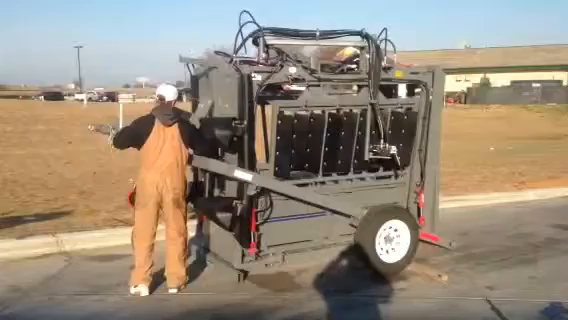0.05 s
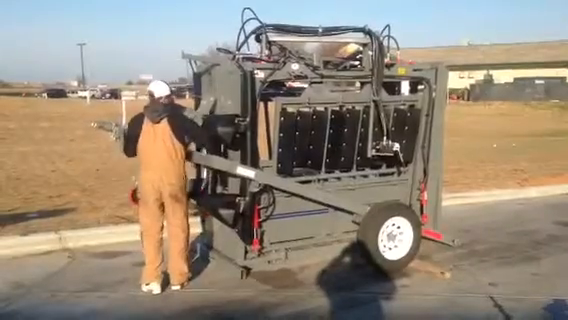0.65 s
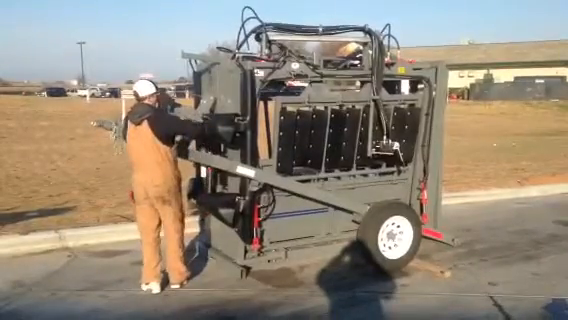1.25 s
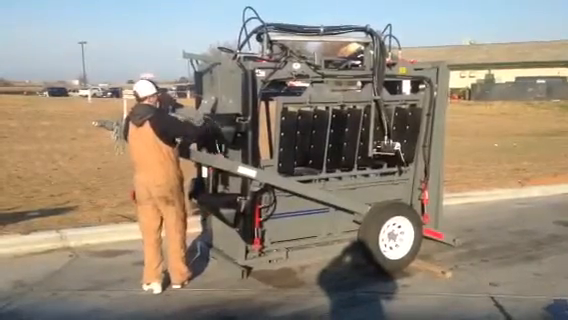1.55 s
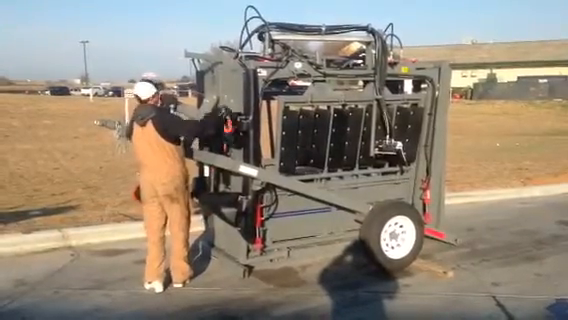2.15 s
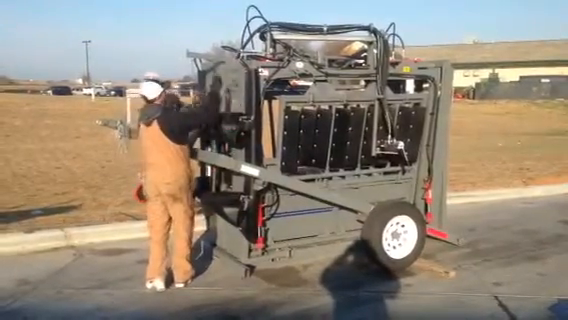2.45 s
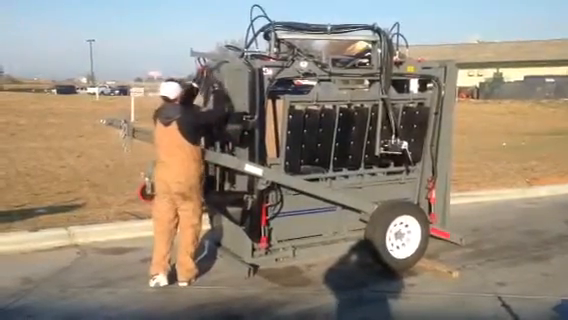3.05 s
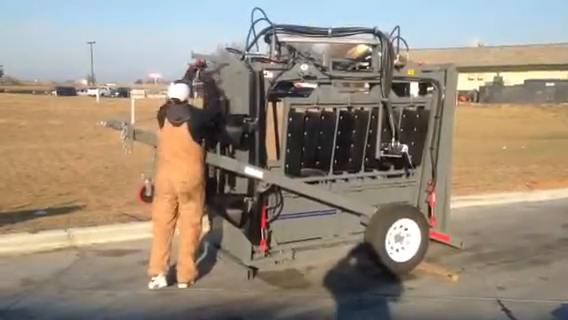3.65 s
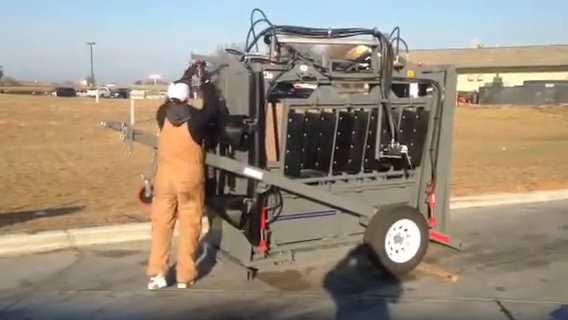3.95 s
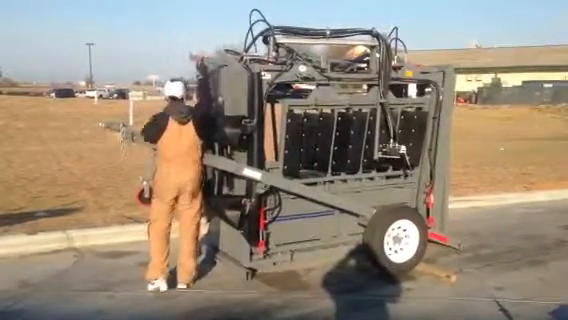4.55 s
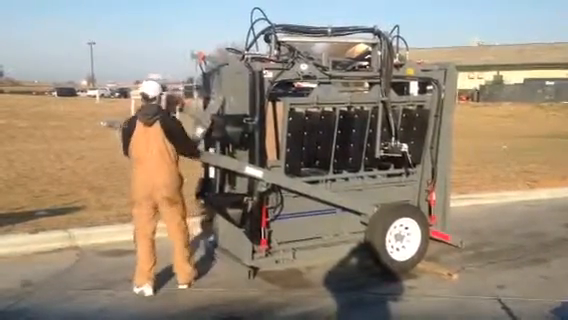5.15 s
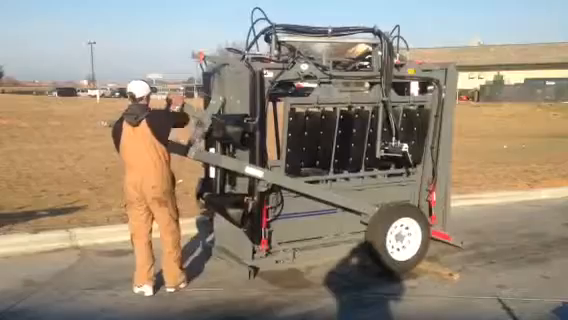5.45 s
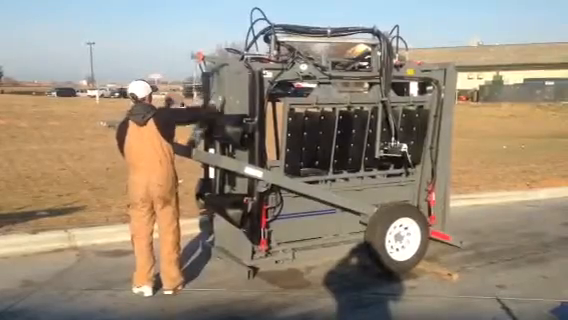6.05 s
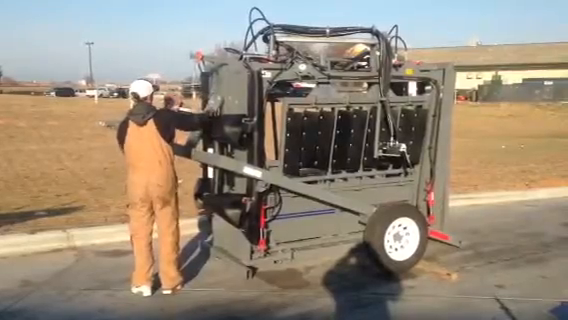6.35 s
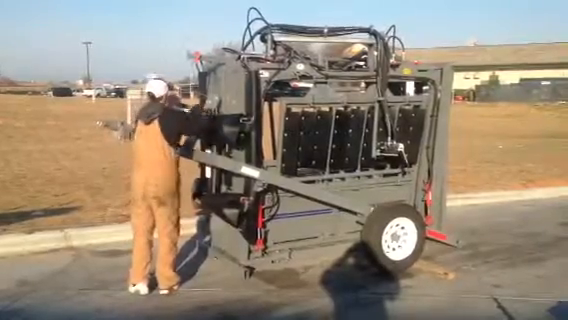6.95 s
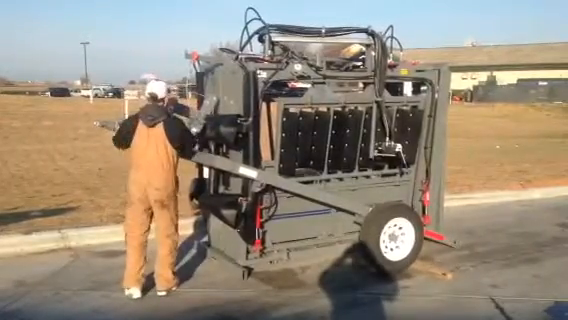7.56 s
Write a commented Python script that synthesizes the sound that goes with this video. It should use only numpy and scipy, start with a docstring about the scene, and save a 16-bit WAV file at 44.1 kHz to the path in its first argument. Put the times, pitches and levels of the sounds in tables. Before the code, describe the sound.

An engine idles low under a soft rush of far traffic outdoors. A few small metal knocks lead to one loud, bright steel clank that rings and ends in two lighter clinks, making the microphone's level dip and recover. Later some fittings rattle, and a hand winch gives a quick run of ratchet clicks, then a shorter one, while a vehicle drones softly past.

```python
"""Steel slam and hand winch

On an open lot, a worker readies a steel machine on a trailer. A latch rattles, then a freed
steel part slams into the frame, rings and settles with two clinks; an automatic volume control
dips and slowly recovers. Later a hand winch is cranked: its catch (the pawl) clicks over the
teeth in two short runs. Behind it all an engine idles, far traffic swells and one vehicle passes."""
import sys
import numpy as np
from scipy import signal
from scipy.fft import rfft, irfft, next_fast_len
from scipy.io import wavfile
from scipy.ndimage import uniform_filter1d

SR = 44100
rng = np.random.default_rng(int(sys.argv[2]) if len(sys.argv) > 2 else 0)


def to_wav(s):
    """Save 16-bit WAV."""
    ch = np.atleast_2d(s).T  # columns
    pcm = np.round(np.clip(ch, -1, 1) * 32767)  # PCM
    wavfile.write(sys.argv[1], SR, pcm.astype(np.int16))


N = 344862

# Strong tones of the struck steel: (pitch [Hz], relative level [dB], time to fade by 60 dB [s])
STEEL_TONES = [(290, -53, 2.22), (778, -28, 0.15), (802, -30, 0.3), (850, -33, 0.19), (1389, -43, 0.45),
               (1508, -26, 0.35), (1523, -28, 0.41), (1543, -25, 0.51), (1739, -17, 0.32),
               (1765, -27, 0.24), (2341, -28, 0.33), (2428, -14.5, 0.28), (2455, -21.5, 0.3),
               (2498, -25, 0.31), (2632, -22, 0.26), (2668, -19, 0.24), (2695, -23, 0.24),
               (2726, -24, 0.24), (2834, -25, 0.31), (2923, -27, 0.27), (3295, -30, 0.28), (3381, -31, 0.3),
               (3604, -20.5, 0.25), (3622, -23.5, 0.24), (4011, -31, 0.27), (4045, -33, 0.24),
               (4721, -39, 0.2), (5157, -21.5, 0.31), (5970, -48, 0.27), (6455, -37, 0.15)]
# Colour of the frame's many weak tones: (pitch [Hz], relative level [dB per Hz])
FRAME_COLOUR = [(300, -33), (600, -26), (780, -11), (1100, -20.5), (1600, -2.5), (2150, -4.5), (2800, 4),
                (3200, -3), (4000, -3.5), (4400, -11.5), (6700, -15), (7500, -24), (8700, -28),
                (10500, -44), (15000, -58)]
# How long those weak tones ring: (pitch [Hz], fade time [s])
FRAME_FADES = [(300, 0.25), (1000, 0.25), (2700, 0.3), (4500, 0.18), (7000, 0.15), (14000, 0.12)]

def clank():
    """Steel slams on steel: a crack, many weak tones, and strong ones that build as the parts chatter."""
    t, out = np.arange(2 * SR) / SR, np.zeros(N)
    early, slam_s = t[:SR // 2], 1.694
    _, tones = weak_tones(FRAME_COLOUR, FRAME_FADES, early, count=480)
    crack = noise(FRAME_COLOUR, len(early)) * blow(early, rise_s=.001, fade_s=.05)
    frame = strike(tones, 1, early, rise_s=.005)
    steel = ringing(STEEL_TONES, t, rise_s=.015, spread_db=.1, contact=hump(2500, octaves=20))
    add(out, slam_s, from_db(-19) * crack + from_db(-15.5) * frame)
    add(out, slam_s, steel)
    return from_db(13) * out


# Light touches after the slam: (time [s], level [dB])
CLINK_HITS = [(2.052, -23), (2.245, -26.5)]

def clinks():
    """The part settles against the frame: the same steel tones, duller, with a little rubbing."""
    t, out = np.arange(SR // 2) / SR, np.zeros(N)
    rise_s, contact = .0043, hump(3700, octaves=.57)
    for s, db in CLINK_HITS:
        steel = ringing(STEEL_TONES, t, rise_s, spread_db=6, contact=contact)
        rub = noise(hump(2460, octaves=.71), len(t)) * blow(t, rise_s, fade_s=.6)
        add(out, s, from_db(db) * (steel + from_db(-20) * rub))
    soften = signal.butter(8, 4150, fs=SR, output="sos")   # a light touch stirs few high tones
    return signal.sosfilt(soften, out)


# Each drop of the pawl over a tooth: (time [s], level [dB])
PAWL_DROPS = [(5.593, -28), (5.700, -29.5), (5.798, -29.5), (5.873, -28), (5.932, -24.5), (5.987, -28.5),
              (6.048, -31), (6.106, -31.5), (6.157, -30), (6.210, -28.5), (7.321, -31.5), (7.391, -31),
              (7.496, -31.5), (7.62, -28), (7.713, -27), (7.811, -27)]
# Colour of the pawl's snap: (pitch [Hz], relative level [dB per Hz])
SNAP_COLOUR = [(400, -40), (1300, -3), (2000, 0.5), (2700, 3.5), (3700, 1), (4200, -4), (4700, -3),
               (5800, -8), (7200, -15.5), (9000, -27), (14000, -37)]
# Strong tones of the winch: (pitch [Hz], relative level [dB], fade time [s])
WINCH_TONES = [(753, -3.5, 0.056), (1370, -16, 0.16), (2016, -8.5, 0.16), (2504, -14, 0.16),
               (2490, -14, 0.4), (2700, -19, 0.095), (2810, -9, .09), (2920, -9, 0.075), (3450, -15, 0.17),
               (3730, -15, 0.12), (4620, -19, 0.16), (4770, -35, 0.29), (5200, -33, 0.26),
               (4970, -43, 0.23), (5820, -17, 0.056), (6670, -28, .06), (7280, -42, .04), (8370, -32, .05),
               (9250, -31, .09)]
# How long the winch's weak tones ring: (pitch [Hz], fade time [s])
WINCH_FADES = [(600, 0.2), (3000, 0.18), (5000, 0.17), (9000, 0.062)]

def ratchet():
    """The pawl snaps down over each tooth, bounces once and sets the winch ringing."""
    t, out = np.arange(SR // 4) / SR, np.zeros(N)
    tone_hz, tones = weak_tones(SNAP_COLOUR, WINCH_FADES, t, count=200)
    rise_s, lead_in_s = .0042, .02
    usual_db = np.mean(PAWL_DROPS, axis=0)[1]
    swell = np.linspace(0, 1, round(lead_in_s * SR))
    for s, db in PAWL_DROPS:
        contact = hump(3220 * 2 ** (.16 * (db - usual_db)), octaves=1.9)   # a harder drop is brighter
        bounce_s = .0072 * rng.uniform(.25, 1.72)
        drop = blow(t, rise_s, fade_s=.037)
        bounce = from_db(-4.5) * blow(t - bounce_s, rise_s=.00068, fade_s=.018)
        echoes = from_db(-15) * blow(t, rise_s=.012, fade_s=.16)   # off the frame and the ground
        colour = [(hz, level + at_hz(contact, hz)) for hz, level in SNAP_COLOUR]
        snap = noise(colour, len(t)) * np.hypot(drop + bounce, echoes)
        shimmer = strike(tones, from_db(at_hz(contact, tone_hz)), t, rise_s)
        winch = ringing(WINCH_TONES, t, rise_s, spread_db=5, contact=contact)
        lead_in = noise(SNAP_COLOUR, len(swell)) * swell   # a faint hiss swells just before each click
        click = from_db(-5) * snap + from_db(-10) * shimmer + from_db(-4) * winch
        add(out, s + rise_s - lead_in_s, from_db(db - 16.5) * lead_in)
        add(out, s, from_db(db) * click)
    return out


# Bumps of the latch and loose fittings: (time [s], level [dB], pitch [Hz])
LATCH_KNOCKS = [(0.216, -47.5, 3250), (1.018, -38, 2940), (1.038, -34.5, 2160), (1.134, -28.5, 2080),
                (1.366, -47, 3400), (4.575, -27, 2740), (4.679, -30.5, 3750), (4.688, -38, 1410),
                (4.807, -45, 3800), (4.982, -45, 4200)]
# The latch sliding in its guide: (time [s], level [dB])
LATCH_SLIDES = [(4.548, -34.5), (4.62, -44), (5.271, -46)]

def latch_rattle():
    """The latch and loose fittings bump and slide; the higher a knock, the sooner it dies."""
    out = np.zeros(N)
    for s, db, hz in LATCH_KNOCKS:
        fade_s = .26 * min(2120 / hz, 1) ** 2.2
        add(out, s, from_db(db) * latch_touch(hump(hz, octaves=.44), rise_s=.005, fade_s=fade_s))
    for s, db in LATCH_SLIDES:
        add(out, s, from_db(db) * latch_touch(hump(3200, octaves=.34), rise_s=.019, fade_s=.34))
    soften = signal.butter(2, 9000, fs=SR, output="sos")   # blunt bumps have little high treble
    return signal.sosfilt(soften, out)


# Tones of the latch: (pitch [Hz], relative level [dB], fade time [s])
LATCH_TONES = [(1070, 1, 0.1), (1533, -6, .25), (1850, -4.5, 0.22), (2000, -23, .18), (2315, -3, 0.11),
               (2270, -12, 0.58), (2490, -4, 0.076), (2845, -0.5, 0.083), (2990, -10, 0.097),
               (3730, -5.5, 0.11), (3950, -12, 0.1), (5340, -11, .14), (5900, -16, .07), (6800, -1, 0.095),
               (8460, 3, .06)]

def latch_touch(contact, rise_s, fade_s):
    """One touch makes a short burst of noise and wakes the latch tones near its own pitch."""
    t = np.arange(SR // 3) / SR
    bump = noise(contact, len(t)) * blow(t, rise_s, fade_s)
    return from_db(-3) * bump + ringing(LATCH_TONES, t, rise_s, spread_db=1.5, contact=contact)


# Faint squeaks at their loudest: (time [s], level [dB])
CRANK_SQUEAKS = [(6.87, -48.5), (7.13, -53)]

def crank_squeak():
    """A dry bearing sings briefly at a wavering pitch as the handle turns."""
    t, swell_s = np.arange(N) / SR, .06
    swell = sum(from_db(db) * np.exp(-.5 * ((t - s) / swell_s) ** 2) for s, db in CRANK_SQUEAKS)
    pitch_hz = 2460 + 18 * noise([(1, -4), (30, -2.5), (200, -38.5)], N)
    return swell * np.sin(2 * np.pi * np.cumsum(pitch_hz) / SR)


# Colour of an engine's rumble: (pitch [Hz], relative level [dB per Hz])
RUMBLE_COLOUR = [(20, -35), (35, -14), (48, -14), (60, -8.5), (76, 1.5), (100, -3.5), (145, 2.5),
                 (200, -12.5), (270, -9), (350, -23.5), (600, -54)]
# Hums made by the engine's firing: (pitch [Hz], relative level [dB])
ENGINE_HUMS = [(48, -48.5), (74, -57), (141, -53.5)]

def idling_engine():
    """The engine rumbles low, and its firing adds a few unsteady hums."""
    hums = 0
    for hz, db in ENGINE_HUMS:
        pitch_hz = hz + 2.98 * noise([(1, -.5), (6, -5), (30, -49.5)], N)
        hums += from_db(db) * np.sin(2 * np.pi * np.cumsum(pitch_hz) / SR)
    return from_db(-43.5) * noise(RUMBLE_COLOUR, N) + from_db(-2.5) * hums


def passing_vehicle():
    """Exhaust drone and rumble grow as a vehicle nears; the drone's pitch sinks as it goes by."""
    t = np.arange(N) / SR
    nearest_s, nearest_m, speed_m_per_s = 6.35, 13, 11
    drone_hz, sound_m_per_s = 186, 343
    distance_m = np.hypot(speed_m_per_s * (t - nearest_s), nearest_m)
    phase = 2 * np.pi * drone_hz * (t - distance_m / sound_m_per_s)
    # How the drone flutters: (rate [Hz], relative level [dB])
    throb = [(1, 1), (42, -1.5), (65, -15), (140, -19.5), (400, -84)]
    drone = noise(throb, N) * np.cos(phase) + noise(throb, N) * np.sin(phase)
    vehicle = from_db(-39.5) * drone + from_db(-45.5) * noise(RUMBLE_COLOUR, N)
    return vehicle * nearest_m / distance_m


# Colour of far roads and wind: (pitch [Hz], relative level [dB per Hz])
TRAFFIC_COLOUR = [(100, -14.5), (380, -2.5), (550, 3.5), (800, 2), (1300, -0.5), (1800, -0.5), (2350, 1.5),
                  (2800, -2.5), (3450, -3.5), (4100, -15.5), (5000, -24), (6500, -29), (10000, -32),
                  (15500, -33.5)]

def far_traffic():
    """Distant roads blur into a soft rush that slowly swells and ebbs."""
    t = np.arange(N) / SR
    crest_s, period_s = 1.55, 5.3
    level_db = -45.5 + .45 * np.cos(2 * np.pi * (t - crest_s) / period_s)
    return from_db(level_db) * noise(TRAFFIC_COLOUR, N)


def ringing(tones, t, rise_s, spread_db, contact):
    """Struck metal rings in fading tones, shaped by the colour of the contact and a little by chance."""
    return sum(from_db(db + at_hz(contact, hz) + spread_db * rng.standard_normal())
               * blow(t, rise_s, fade_s)
               * np.sin(2 * np.pi * (hz * t + rng.random())) for hz, db, fade_s in tones)


def weak_tones(colour, fades, t, count):
    """A steel body's many faint tones: their random pitches, and one fading complex wave for each."""
    hz = 300 + 14500 * (np.arange(count) + rng.random(count)) / count
    fade_s = at_hz(fades, hz) * from_db(rng.uniform(-2.2, 3.5, count))
    gain = from_db(at_hz(colour, hz))
    gain /= np.linalg.norm(gain)
    rate = 2j * np.pi * hz - np.log(1000) / fade_s
    return hz, gain[:, None] * np.exp(rate[:, None] * t)


def strike(tones, weights, t, rise_s):
    """One hit starts every weak tone with a random strength, at a random point in its wave."""
    push = weights * (rng.standard_normal(len(tones)) + 1j * rng.standard_normal(len(tones)))
    return (push @ tones).real * np.clip(t / rise_s, 0, 1)


def blow(t, rise_s, fade_s):
    """Shaking builds up during a hit, then falls by 60 dB every fade_s seconds."""
    return np.clip(t / rise_s, 0, 1) * np.exp(-np.log(1000) * np.maximum(t - rise_s, 0) / fade_s)


def noise(colour, size):
    """Noise with the given colour (its balance of low and high pitches) and a typical size of 1."""
    length = next_fast_len(size)
    hz = np.maximum(np.fft.rfftfreq(length, 1 / SR), 1)
    spectrum = rfft(rng.standard_normal(length)) * from_db(at_hz(colour, hz))
    x = irfft(spectrum, length)[:size]
    return x / np.std(x)


def hump(centre_hz, octaves):
    """A colour with one broad peak: (pitch [Hz], level [dB])."""
    hz = np.geomspace(20, 20000, 200)
    offset = np.log2(hz / centre_hz) / octaves
    return np.c_[hz, -60 * np.log10(1 + offset ** 2 / 4)]


def at_hz(table, hz):
    """Read a table at any pitch, gliding between its rows by octaves."""
    known_hz, values = np.transpose(table)
    return np.interp(np.log(hz), np.log(known_hz), values)


def from_db(db):
    """Turn decibels into a multiplier."""
    return 10 ** (np.asarray(db) / 20)


def add(track, s, sound):
    """Mix a sound into the track, starting at s seconds."""
    start = round(s * SR)
    track[start:start + len(sound)] += sound[:N - start]


def scene():
    """The machine and its background in the open air, on one channel."""
    machine = clank() + clinks() + latch_rattle() + ratchet() + crank_squeak()
    return (machine + idling_engine() + passing_vehicle() + far_traffic())[None]


def volume_control(x, threshold_db, recovery_s):
    """The volume drops at once when the sound gets too loud, then creeps back."""
    power = np.maximum(uniform_filter1d(x ** 2, size=600, axis=-1), 1e-12)
    excess_db = np.maximum(10 * np.log10(power) - threshold_db, 0)
    fading = np.exp(-np.arange(N) / SR / recovery_s)
    dip_db = np.maximum.accumulate(excess_db / fading, axis=-1) * fading
    return x * from_db(-dip_db)


def record(dry):
    """The slam makes the volume dip, and the very highest treble is cut away."""
    levelled = volume_control(dry, threshold_db=-12, recovery_s=1)
    treble_cut = signal.ellip(12, .1, 80, 15350, fs=SR, output="sos")
    return signal.sosfilt(treble_cut, levelled)


dry = scene()
out = record(dry)
to_wav(out)
```